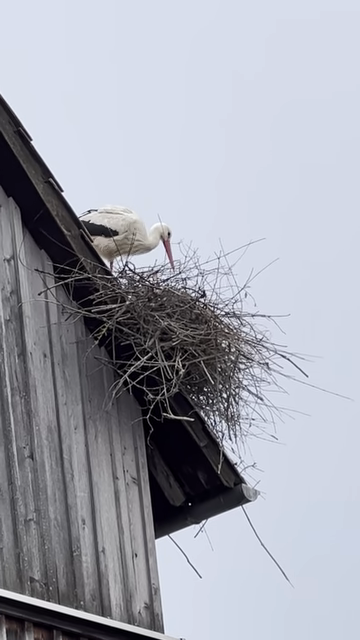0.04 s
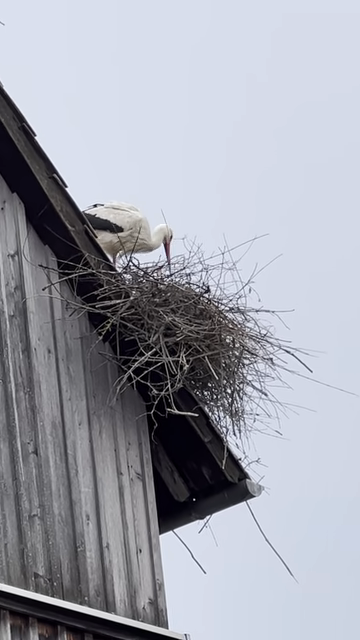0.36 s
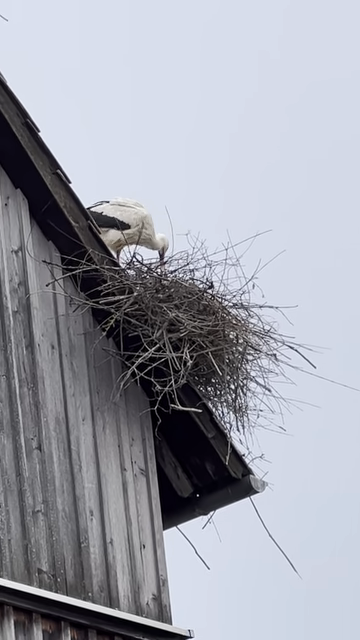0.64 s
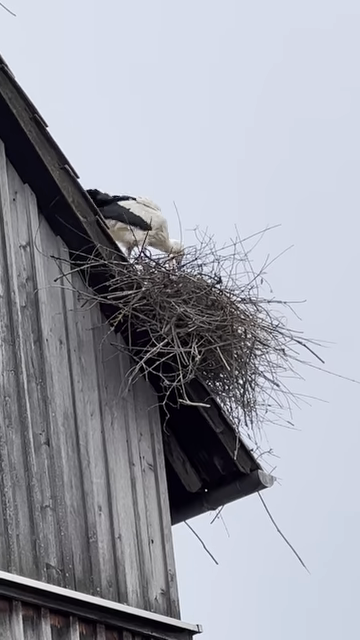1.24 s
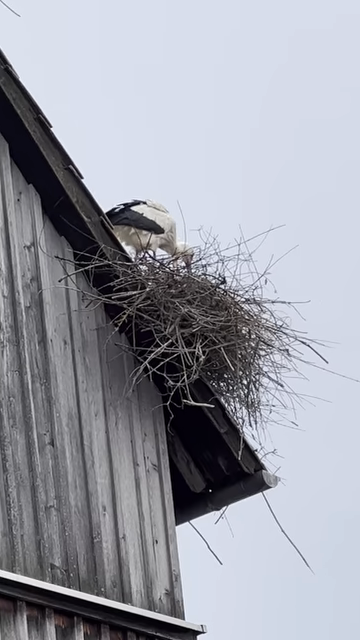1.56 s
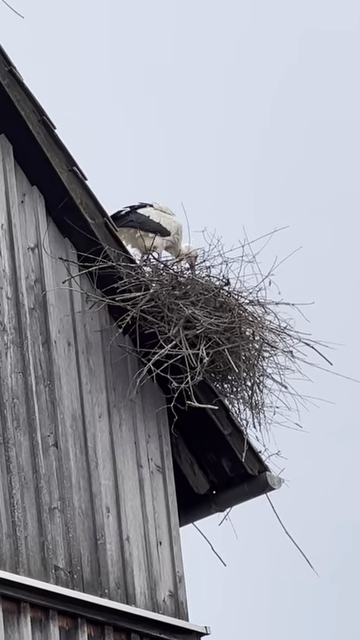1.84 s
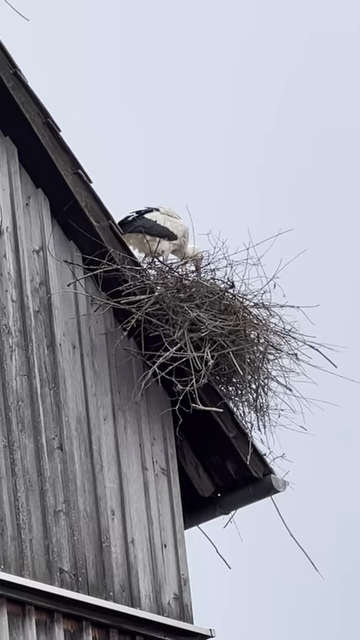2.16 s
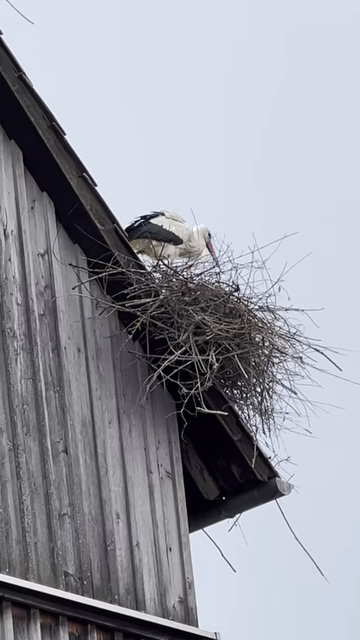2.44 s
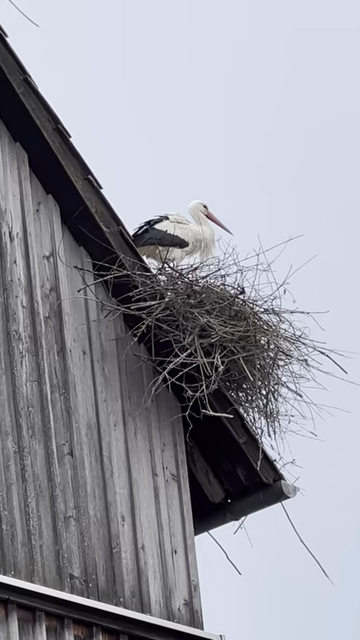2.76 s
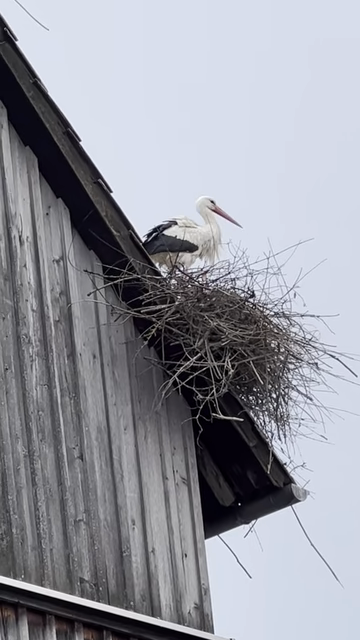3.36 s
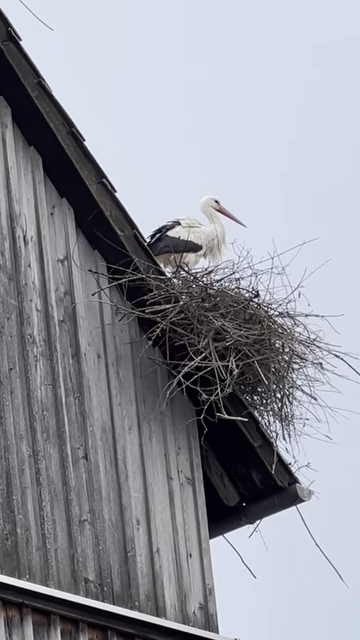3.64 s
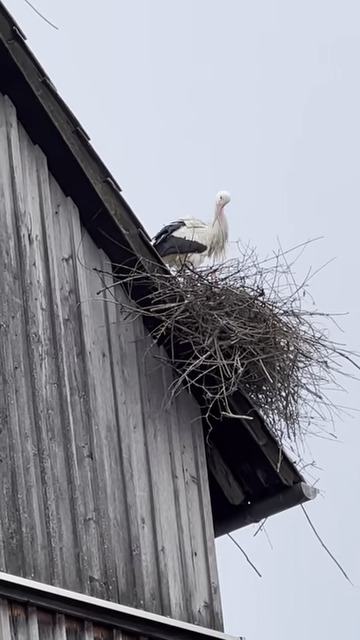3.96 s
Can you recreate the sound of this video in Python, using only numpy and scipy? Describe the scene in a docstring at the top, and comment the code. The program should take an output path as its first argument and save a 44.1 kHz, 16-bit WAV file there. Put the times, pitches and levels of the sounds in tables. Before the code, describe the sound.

Sparrows chirp outdoors over a faint low rumble, with a puff of wind near the end.

```python
"""Beside a wooden barn, sparrows give three sharp chirps, two clean arched calls and a few softer,
warbled ones, echoed by the walls. Each call is a tone that slides quickly in pitch; in the chirps,
the throat and beak also ring and bring out overtones. Other small birds whistle further off, over
a low rumble, faint outdoor air and a far drone that soon fades. Near the end a puff of wind
buffets the microphone."""
import sys
import numpy as np
from scipy import signal
from scipy.fft import rfft, irfft
from scipy.io import wavfile
from scipy.ndimage import uniform_filter1d

SR = 44100
rng = np.random.default_rng(int(sys.argv[2]) if len(sys.argv) > 2 else 0)


def waveform_to_disk(signal):
    """Save audio, clipped to [-1, 1], as 16-bit WAV at the path in sys.argv[1]."""
    frames = np.transpose(np.atleast_2d(signal))
    scaled = np.clip(frames, -1, 1) * 32767
    samples = np.round(scaled).astype(np.int16)
    wavfile.write(sys.argv[1], SR, samples)


N = 176400  # 4 seconds
QUAVER, QUAVER_RATE_HZ = .012, 260  # a bird's pitch wobbles by this fraction, at about this rate
SCRATCH_RATE_HZ = 1800  # a much faster wobble sounds scratchy
TOP_HZ = 15700  # upper edge of the treble

# Stereo width of the air, as the level of the part that differs between the ears: f/Hz, level/dB
AIR_WIDTH = [(60, -66), (130, -48), (220, -16.5), (350, -8), (640, -3), (1150, 0), (2000, -19.5),
             (4000, -38), (6500, 0), (12000, -2)]


def sparrow_chirps(t):
    """Each chirp sweeps up, drops and flicks; overtones light up as they cross the beak's resonance."""
    # Path of one chirp, timed from its highest pitch: t/s, f/Hz, level/dB
    shape = [(-.062, 1916, -22.5), (-.036, 2150, -10), (-.022, 2380, -2), (-.016, 2950, -6),
             (-.009, 3900, -3), (0, 4480, 3), (.005, 3100, -11), (.011, 3000, 0.5), (.016, 3480, -3.5),
             (.021, 2480, -4), (.032, 2221, -5.5), (.041, 2400, 4), (.051, 2950, 2.5), (.058, 2550, 6.5),
             (.074, 2080, 4)]
    # Chirps: highest point t/s, level/dB, pitch/ratio, flick height/Hz, rise time/ratio, echo level/dB
    calls = [(0.3151, -38, 1.02, -150, 1.04, -8.5), (1.3755, -42, 1.01, -100, 1.05, -3.5),
             (2.9917, -36.5, .99, 396, .95, -8.5)]
    # How the throat and beak boost or weaken each frequency: f/Hz, level/dB
    beak = [(2000, -10), (2400, -14.5), (2850, -5.5), (3500, -2.5), (4450, 4.5), (5300, -6.5), (6300, -2),
            (7300, -10.5), (8700, -16), (10000, -17), (11500, -13), (13000, -46)]
    # The tones that make up the voice: multiple of the pitch, level/dB
    harmonics = [(1, -2), (2, -4), (3, -9), (4, -14.5), (5, -21)]
    flick_s, flick_width_s = .0154, .00321
    hiss_db, hiss_peak_s, hiss_width_s = -18, .0064, .051
    pure_from_s, fade_db_per_s = .035, 800  # overtones fade, leaving a purer last note
    when, pitch, loudness = np.array(shape).T
    wobble = 1 + .016 * wander(SCRATCH_RATE_HZ) + QUAVER * wander(QUAVER_RATE_HZ)
    hiss = pass_filter(noise(beak + [(15000, -60)]), "high", 2000)
    out = np.zeros((2, N))
    for top, db, ratio, flick, stretch, echo_db in calls:
        times = np.where(when < 0, when * stretch, when)
        on = (t > top + times[0]) & (t < top + times[-1])
        u = t[on] - top
        hz = np.interp(u, times, pitch) + flick * hump(u, flick_s, flick_width_s)
        hz = uniform_filter1d(hz, size=90) * ratio * wobble[on]
        phase = 2 * np.pi * np.cumsum(hz) / SR
        overtone_fade = undb(-fade_db_per_s * np.clip(u - pure_from_s, 0, .018))
        voice = np.zeros(len(u))
        for k, harmonic_db in harmonics:
            gain = undb(harmonic_db + by_pitch(k * hz, beak)) * (k * hz < TOP_HZ)
            voice += gain * np.sin(k * phase) * (overtone_fade if k > 1 else 1)
        call = undb(hiss_db) * hump(t - top, hiss_peak_s, hiss_width_s) * hiss
        call[on] += undb(np.interp(u, times, loudness)) * voice * signal.windows.tukey(len(u), .2)
        out += undb(db) * yard_echoes(barn_echoes(call, t), echo_db)
    return out


def arched_calls(t):
    """Each call is one clean, unbroken note that arches, slides down and ends in quick flicks."""
    # Path of one call, timed from its drop in pitch: t/s, f/Hz, level/dB
    shape = [(-.048, 3123, -14), (-.038, 4026, -8.5), (-.026, 4230, -7.5), (-.015, 4080, -5),
             (-.005, 3745, 2.5), (0, 4020, -11), (.006, 2950, 1.5), (0.021, 3290, -3), (.028, 3100, -6),
             (.037, 2650, -9)]
    # Calls: drop t/s, level/dB
    calls = [(1.586, -43), (2.812, -43)]
    warble_depth_hz, flicks_per_s, warble_from_s = 380, 133, .01454
    when, pitch, loudness = np.array(shape).T
    wobble = 1 + QUAVER / 2 * wander(QUAVER_RATE_HZ)
    out = np.zeros(N)
    for drop, db in calls:
        on = (t > drop + when[0]) & (t < drop + when[-1])
        u = t[on] - drop
        turns = (u - warble_from_s) * flicks_per_s
        warble = np.clip(1 + turns, 0, 1) * flicks(turns)
        hz = uniform_filter1d(np.interp(u, when, pitch), size=90) + warble_depth_hz * warble
        gain = undb(db + np.interp(u, when, loudness)) * signal.windows.tukey(len(u), .1)
        out[on] += gain * pure_voice(hz * wobble[on])
    return yard_echoes(out, echo_db=-8)


def soft_calls(t):
    """Short, softer calls nearby, most of them warbled, echo round the yard."""
    # Calls: start t/s, length/s, first f/Hz, middle f/Hz, last f/Hz, level/dB, warble depth/Hz
    calls = [(-.01, 0.0386, 3350, 3150, 2920, -56, 447), (1.129, 0.027, 4300, 5070, 5270, -64, 350),
             (1.15, 0.022, 3655, 4460, 3540, -51.5, 95), (1.168, 0.02, 3430, 3885, 3800, -52, 380),
             (1.197, 0.033, 3110, 3180, 2430, -55.5, 350), (1.231, 0.015, 3020, 3370, 3000, -60, 352),
             (2.78, 0.0314, 5720, 5950, 5740, -61, 500), (2.808, 0.01, 3930, 4590, 4920, -45.5, 0),
             (2.85, 0.036, 3980, 3890, 3600, -56, 546), (2.855, .038, 3160, 3050, 2820, -54, 480)]
    return yard_echoes(bent_notes(t, calls, QUAVER), echo_db=-.5)


def far_birds(t):
    """Distant whistles and faint random twitter flutter in the air and arrive mostly as echo."""
    # Whistles: start t/s, length/s, first f/Hz, middle f/Hz, last f/Hz, level/dB
    whistles = [(.04, 0.31, 3110, 2963, 2980, -69), (0.136, 0.04, 4800, 5200, 4720, -64.5),
                (0.466, 0.037, 4290, 5260, 4960, -66), (1.296, 0.039, 4800, 5300, 5100, -62),
                (1.519, 0.015, 4520, 4860, 5570, -61), (1.641, 0.04, 4560, 5260, 5100, -60),
                (1.708, 0.034, 3120, 3060, 2910, -61.5), (1.809, 0.053, 5800, 4200, 3070, -65),
                (1.874, 0.06, 5600, 3880, 2760, -62), (2.08, 0.041, 4600, 5400, 4330, -65.5),
                (2.34, 0.014, 3100, 2930, 2680, -66.5), (2.441, 0.025, 4100, 3960, 3500, -63.5),
                (2.486, 0.092, 3100, 3096, 3030, -68.5), (2.522, 0.016, 3430, 4360, 4800, -62.5),
                (2.621, 0.05, 4450, 5340, 4630, -64), (3.401, 0.052, 6200, 4660, 3460, -66),
                (3.473, 0.022, 5400, 4800, 4350, -63.5), (3.845, 0.103, 3970, 3990, 4070, -67),
                (3.87, 0.11, 3170, 3080, 3040, -66.5)]
    count, low_hz, high_hz = 150, 2856, 4930
    twitter = []
    for when, pitch, bend, slide, length in rng.random((count, 5)):
        hz = low_hz + pitch * (high_hz - low_hz)
        first, last = hz * (1 + .3205 * (bend - .5)), hz * (1 + .34 * (slide - .7))
        db = -74.5 - 9.5 * np.log2(hz / low_hz)  # the air dulls the highest twitter
        twitter.append((when * N / SR, .031 + .0376 * length, first, hz, last, db))
    song = bent_notes(t, whistles, quaver=.026) + bent_notes(t, twitter, quaver=.0523)
    flutter = undb(2 * wander(90))
    return yard_echoes(song * flutter, echo_db=0, decay_s=.3, direct_db=-5)


def bent_notes(t, rows, quaver):
    """Nearly pure notes bend through three pitches; some warble in quick, uneven, scratchy flicks."""
    flicks_per_s, fade_s = 106, .002
    wobble = 1 + quaver * wander(QUAVER_RATE_HZ)
    uneven_rate = flicks_per_s * (1 + .24 * wander(flicks_per_s))
    warble = flicks(np.cumsum(uneven_rate) / SR)
    scratch = 1 + .068 * wander(SCRATCH_RATE_HZ)
    out = np.zeros(N)
    for start, length, first, middle, last, db, *depth in rows:
        on = (t > start) & (t < start + length)
        u = t[on] - start
        hz = np.polyval(np.polyfit([0, .5, 1], [first, middle, last], 2), u / length)
        if any(depth):
            hz = (hz + depth[0] * warble[on]) * scratch[on]
        fade = np.sin(np.pi / 2 * np.clip(np.minimum(u, length - u) / fade_s, 0, 1))
        out[on] += undb(db) * fade * pure_voice(hz * wobble[on])
    return out


def pure_voice(hz):
    """A clean tone with one faint overtone at three times its pitch."""
    # Strength of the overtone, weaker when very high: f/Hz, level/dB
    overtone = [(11800, -36.5), (13200, -56)]
    phase = 2 * np.pi * np.cumsum(hz) / SR
    return np.sin(phase) + undb(by_pitch(3 * hz, overtone)) * np.sin(3 * phase)


def flicks(turns):
    """The shape of a warble: one sharp upward flick of pitch per turn."""
    return 1 - np.pi / 2 * np.abs(np.sin(np.pi * turns))


def barn_echoes(x, t):
    """The nearest surfaces bounce the sound back as later, quieter copies."""
    # Echoes from wall, eaves and ground: delay/s, level/dB
    bounces = [(.0062, -7.5), (0.0141, -19.5), (0.038, -31)]
    return x + sum(undb(db) * np.interp(t - np.round(delay * SR) / SR, t, x, left=0)
                   for delay, db in bounces)


def yard_echoes(x, echo_db, decay_s=.24, direct_db=0):
    """The farmyard adds scattered echoes, short in the treble, with a faint long tail from the fields."""
    # Stereo width of the echoes, as the level of the part that differs between the ears: f/Hz, level/dB
    width = [(3000, -17.5), (5000, -13), (8000, 10.5)]
    split_hz, treble_decay_s, build_s = 4500, .11, .00072
    field_db, field_decay_s = -18, 1
    u = np.arange(SR) / SR
    fade = lambda seconds: 1000 ** (-u / seconds)  # falls 60 dB in that time
    white = rng.standard_normal((2, SR))
    low = pass_filter(white, "low", split_hz) * (fade(decay_s) + undb(field_db) * fade(field_decay_s))
    high = pass_filter(white, "high", split_hz) * fade(treble_decay_s)
    tail = (low + high) * (1 - np.exp(-u / build_s))
    tail /= np.sqrt(np.sum(fade(decay_s) ** 2))
    mid, side = signal.fftconvolve(x[None], tail, axes=1)[:, :N]
    side = colour(side, width)
    return undb(direct_db) * x + undb(echo_db) * np.array([mid + side, mid - side])


def wind_puff(t):
    """Moving air buffets the microphone with a deep rumble, while a soft rush swells and dies away."""
    # Strength of the buffeting over time: t/s, level/dB
    gust = [(3.03, -40), (3.13, -12.5), (3.28, -3), (3.34, -6), (3.39, -0.5), (3.45, -5.5), (3.6, -10),
            (3.75, -10), (4.0, -15.5)]
    # Tone of the air hitting the microphone: f/Hz, level/dB
    buffet_tone = [(20, -34), (35, -17), (50, 3.5), (68, 14.5), (92, -2), (135, 2.5), (180, -12.5),
                   (230, -13.5), (400, -67), (2000, -91)]
    # Tone of the rushing air: f/Hz, level/dB
    rush_tone = [(200, 9.5), (400, -2), (680, -0.5), (1040, -9), (1500, -1), (2100, -10), (4500, -19.5),
                 (6300, -25), (8000, -38), (9400, -31.5), (10500, -43.5), (14000, -50)]
    peak_s, rise_s, fall_s = 3.36, .24, .52
    buffet = noise(buffet_tone) * undb(np.interp(t, *np.array(gust).T))
    mid, side = noise(rush_tone), colour(noise(rush_tone), AIR_WIDTH)
    swell = hump(t, peak_s, np.where(t < peak_s, rise_s, fall_s))
    return undb(-33) * buffet + undb(-51) * swell * np.array([mid + side, mid - side])


def outdoor_air():
    """A low rumble and faint airy noise waver slightly and lean a little to the left."""
    # Tone of the background: f/Hz, level/dB
    tone = [(20, -24.5), (36, -6), (65, 1), (110, 0), (160, -9), (210, -7.5), (260, -14.5), (400, -20),
            (700, -22.5), (1000, -28), (1400, -23), (2100, -30), (3000, -32), (4500, -33.5), (5400, -43),
            (6300, -47), (9500, -53.5), (12700, -61.5), (16000, -63)]
    # How much louder the left is than the right: f/Hz, level/dB
    lean = [(300, -0.5), (650, 2.5), (1100, 1.5), (2000, 2.5)]
    mid = noise(tone) * undb(-.78 * wander(31))
    side = colour(noise(tone), AIR_WIDTH)
    ears = [colour(mid + sign * side, [(hz, sign * db / 2) for hz, db in lean]) for sign in (1, -1)]
    return undb(-53) * np.array(ears)


def far_drone(t):
    """A low, distant drone that fades early on."""
    # Tone of the drone: f/Hz, level/dB
    tone = [(120, -10.5), (190, -3.5), (225, -1), (255, -13), (292, -1.5), (330, -11), (2000, -70)]
    return undb(-57.5) * noise(tone) * hump(t, peak_s=.28, width_s=.36)


def undb(db):
    """Turn decibels into a number to multiply by."""
    return 10 ** (np.asarray(db) / 20)


def hump(t, peak_s, width_s):
    """A smooth rise to 1 and fall back."""
    return np.exp(-((t - peak_s) / width_s) ** 2)


def by_pitch(hz, rows):
    """Look up a level between (f/Hz, level/dB) rows, with octaves evenly spaced."""
    f, db = np.array(rows, float).T
    return np.interp(np.log(np.maximum(hz, 1)), np.log(f), db)


def colour(x, rows):
    """Turn each frequency up or down by (f/Hz, level/dB) rows."""
    return irfft(rfft(x) * undb(by_pitch(np.arange(N // 2 + 1) * SR / N, rows)), N)


def pass_filter(x, keep, hz, order=4):
    """Keep the "low" or "high" side of a frequency."""
    return signal.sosfilt(signal.butter(order, hz, keep, fs=SR, output="sos"), x)


def noise(rows):
    """Noise with the given tone and a typical size of 1."""
    x = colour(rng.standard_normal(N), rows)
    return x / x.std()


def wander(rate_hz):
    """A smooth random drift with a typical size of 1."""
    size = max(int(SR / rate_hz), 1)
    x = uniform_filter1d(rng.standard_normal(N), size, mode="wrap")
    x = uniform_filter1d(x, size, mode="wrap")
    return x / x.std()


def scene():
    """Near and far birds over the background and the wind."""
    t = np.arange(N) / SR
    sparrows = sparrow_chirps(t) + arched_calls(t) + soft_calls(t)
    return sparrows + far_birds(t) + outdoor_air() + far_drone(t) + wind_puff(t)


def record(dry):
    """The recorder cuts the deepest bass and the highest treble."""
    dry = pass_filter(dry, "high", 24, order=2)
    return signal.sosfilt(signal.ellip(10, .2, 80, TOP_HZ, fs=SR, output="sos"), dry)


dry = scene()
out = record(dry)
waveform_to_disk(out)
```